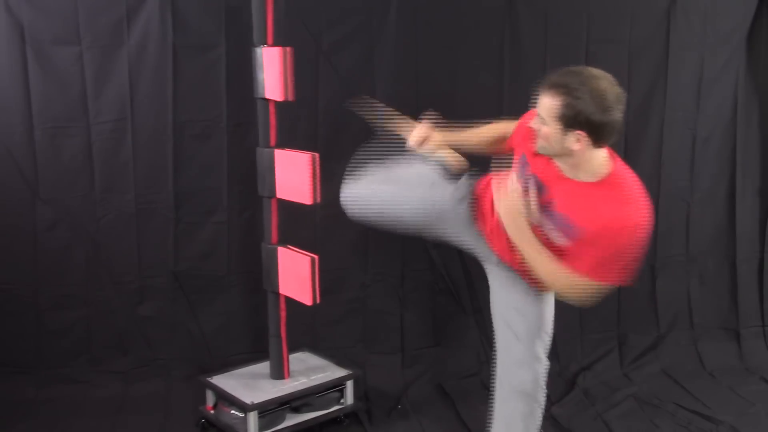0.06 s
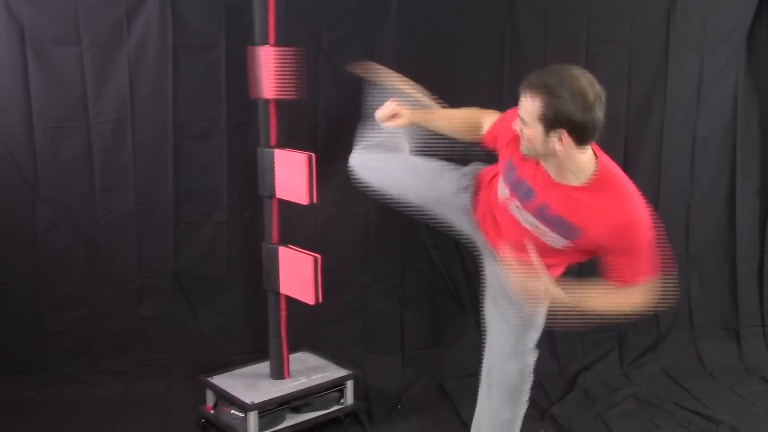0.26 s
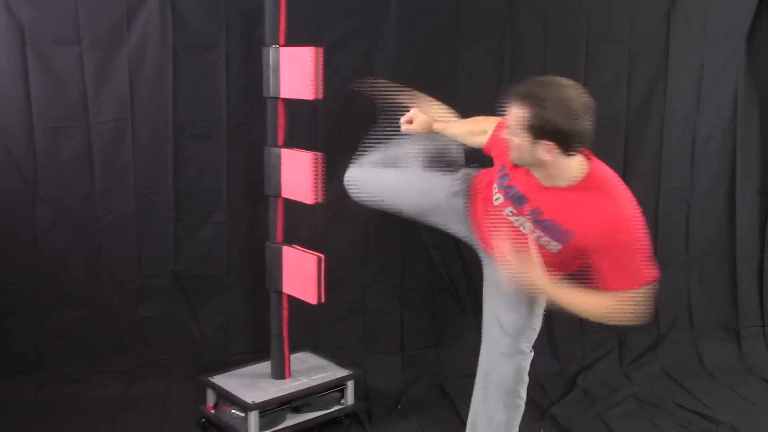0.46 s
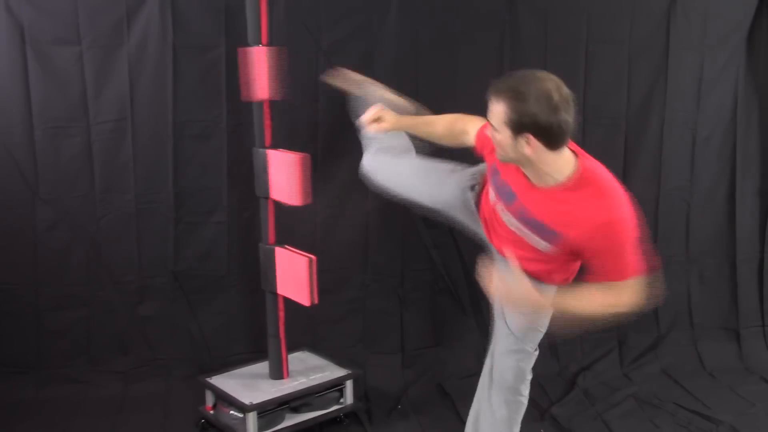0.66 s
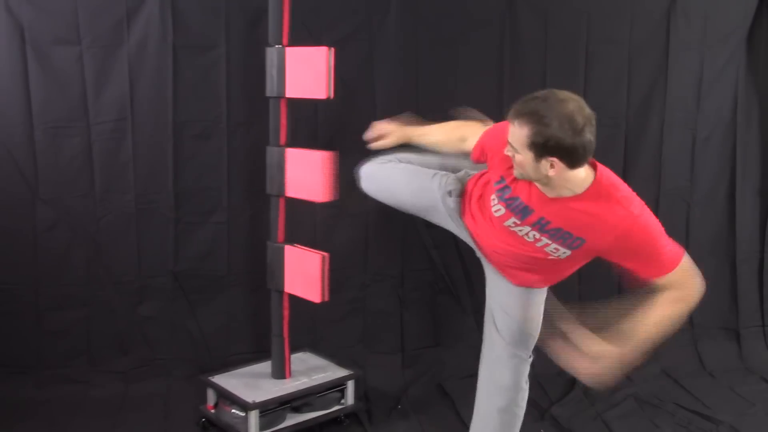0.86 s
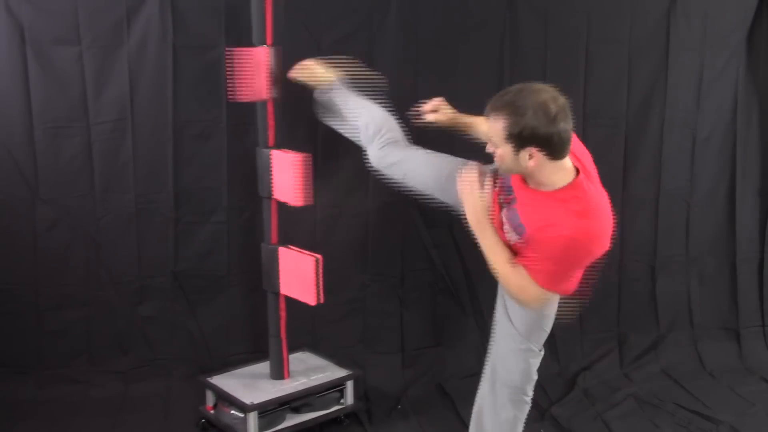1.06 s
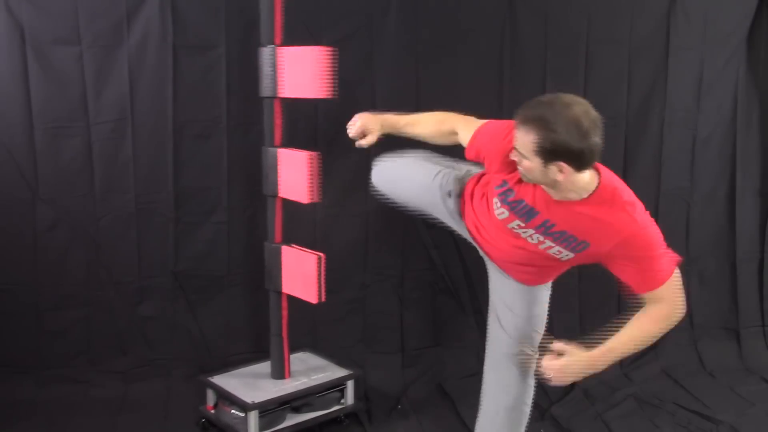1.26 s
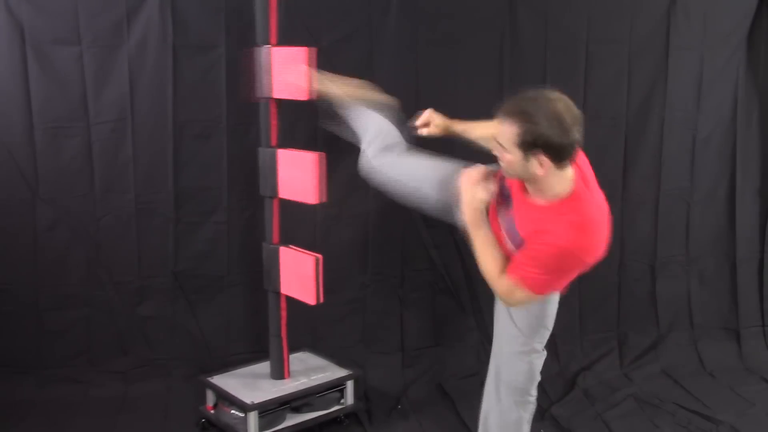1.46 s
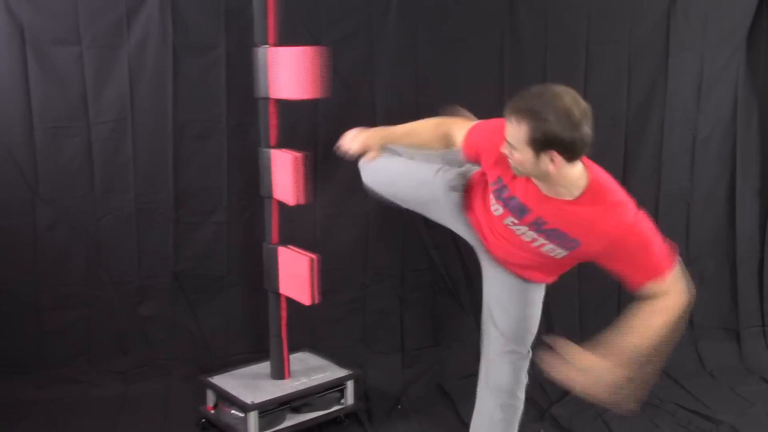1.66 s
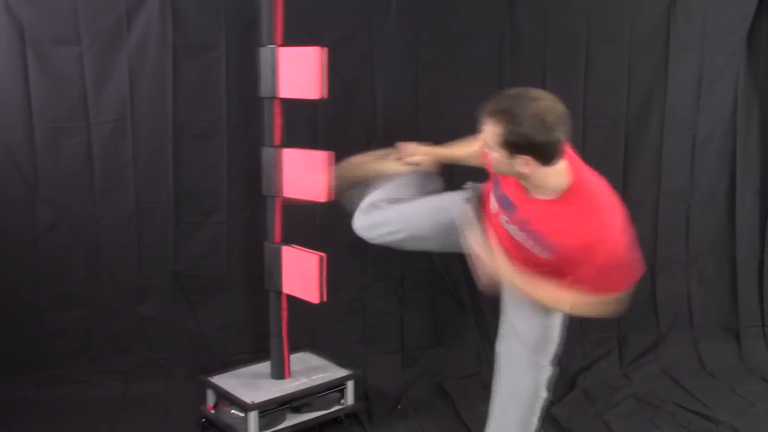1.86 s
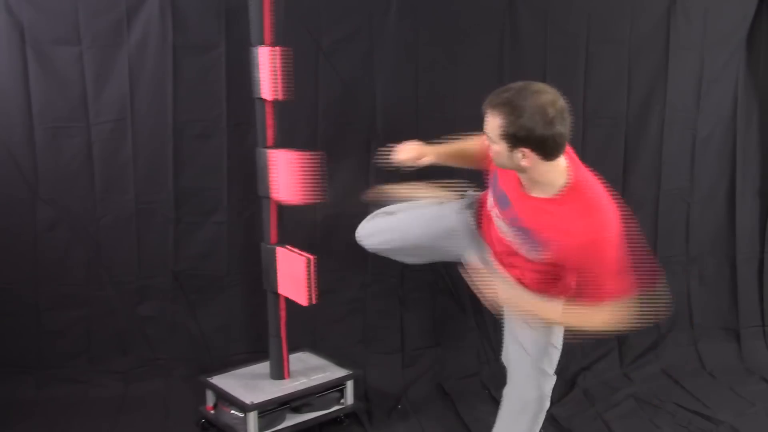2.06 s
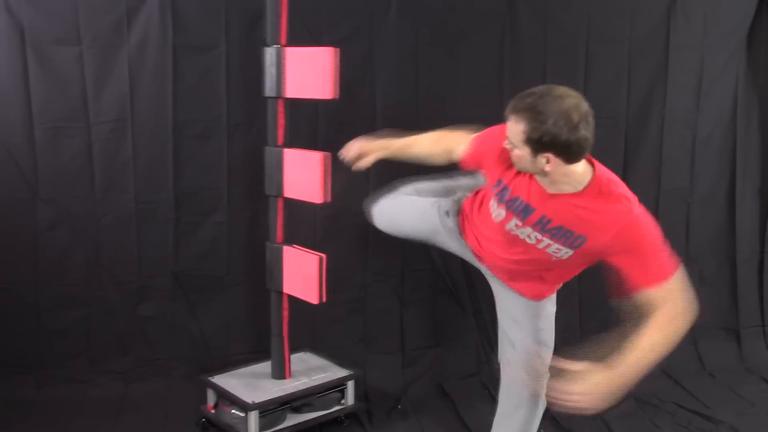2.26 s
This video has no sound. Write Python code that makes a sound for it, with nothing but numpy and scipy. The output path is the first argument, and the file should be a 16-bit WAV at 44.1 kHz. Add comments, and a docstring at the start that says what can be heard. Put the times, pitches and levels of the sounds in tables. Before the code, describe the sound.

A foot hits padded paddles five times, with slapping thuds and a short room echo.

```python
"""Faint knocks and a swish of trousers, then five quick kicks on padded paddles on a post.
Each kick is a light touch, a thud as the foam bottoms out, a slap of the pad and a crinkle
of its cover. The paddle swings back, scraping and knocking on its sprung mount; cloth
swishes between kicks. The bare training room echoes, and post and room ring low."""
import sys
import numpy as np
from scipy import signal
from scipy.fft import rfft, irfft
from scipy.io import wavfile
from scipy.ndimage import uniform_filter1d, minimum_filter1d

SR = 44100
rng = np.random.default_rng(int(sys.argv[2]) if len(sys.argv) > 2 else 0)


def master(y):
    """Save y as 16-bit WAV."""
    cut = np.clip(np.atleast_2d(y).T, -1, 1)
    pcm = np.round(cut * 32767)  # scale
    wavfile.write(sys.argv[1], SR, pcm.astype(np.int16))


N = 101429
BINS_HZ = abs(np.fft.fftfreq(4096, 1 / SR))


def amp(db):
    """Decibels to gain."""
    return 10 ** (np.asarray(db) / 20)


def unit(x):
    """Scale to unit energy."""
    return x / np.sqrt(np.sum(x ** 2) + 1e-20)


def read(table, hz=BINS_HZ):
    """Interpolate a table over log frequency."""
    table_hz, values = np.transpose(table)
    return np.interp(np.log(hz + 1), np.log(table_hz), values)


def add(mix, t_s, sound):
    """Mix a sound in at t_s."""
    part = mix[max(round(t_s * SR), 0):][:len(sound)]
    part += sound[:len(part)]


def bell(hz, centre_hz, width_oct):
    """Bell of height one over log frequency."""
    return 1 / (1 + (np.log2((hz + 1) / centre_hz) / width_oct) ** 2)


def pulse(spectrum_db):
    """Minimum-phase pulse of a given spectral shape, unit energy."""
    log_spectrum = np.conj(signal.hilbert(np.log(amp(spectrum_db))))
    return unit(np.fft.ifft(np.exp(log_spectrum)).real[:len(spectrum_db) // 2])


def burst(rise_s, fall_s):
    """Envelope: linear rise, exponential fall."""
    t = np.arange(SR // 5) / SR
    return np.minimum(t / rise_s, 1) * np.exp(-np.maximum(t - rise_s, 0) / fall_s)


def stroke(length_s, edge_s=0.0015):
    """Envelope: quick start, hold, quick release."""
    t = np.arange(SR // 5) / SR
    return np.minimum(t / edge_s, 1) * np.exp(-np.maximum(t - length_s, 0) / edge_s)


def rub(envelope, colour, spread_db):
    """Dense tiny clicks of uneven size, filtered by a material's pulse."""
    sizes = amp(spread_db * np.minimum(rng.exponential(1, N), 4))
    clicks = rng.standard_normal(N) * sizes
    return signal.fftconvolve(unit(clicks[:len(envelope)] * envelope), colour)


# Room decay: f/Hz, T60/s
ROOM_T60 = [(60, 0.83), (150, 0.94), (350, 0.66), (850, 0.61), (2200, 0.56), (6000, 0.66), (15000, 0.14)]
# Floor and nearest wall: delay/s, level/dB re direct
REFLECTIONS = [(.0043, -4.5), (.0092, -6)]


def room(x, direct_db, reflect_db=0, early_db=1.5, early_s=0.082, onset_s=0.001):
    """Direct sound, two near reflections and dense echoes, each band dying at its own rate."""
    t = np.arange(SR) / SR
    step = 12
    count = SR // step
    taps = np.zeros(SR)
    taps[np.arange(count) * step + rng.integers(0, step, count)] = rng.choice([-1., 1.], count)
    hz, frame_s, bands = signal.stft(taps, SR, nperseg=256)
    decay = amp(-60 * frame_s / read(ROOM_T60, hz)[:, None])
    tail = signal.istft(bands * decay, SR, nperseg=256)[1][:SR]
    near_walls = amp(early_db * np.exp(-(t / early_s) ** 2))
    response = unit(tail * np.minimum(t / onset_s, 1) * near_walls)
    response[0] += amp(direct_db)
    for delay_s, db in REFLECTIONS:
        response[round(delay_s * rng.uniform(.9, 1.1) * SR)] += amp(direct_db + reflect_db + db)
    return signal.fftconvolve(x, unit(response))


# Room noise spectrum: f/Hz, level/dB
AIR_SPECTRUM = [(20, -32), (60, -19.5), (85, -23), (140, -0.5), (400, 2), (800, -1), (1500, -7.5),
                (3500, -17), (6500, -21), (11000, -28.5), (16000, -44)]


def air(level_db=-44, waver_db=1.5):
    """Steady room noise, wavering slightly."""
    gains = amp(read(AIR_SPECTRUM, np.fft.rfftfreq(N, 1 / SR)))
    noise = irfft(rfft(rng.standard_normal(N)) * gains, N)
    drift = uniform_filter1d(uniform_filter1d(rng.standard_normal(N), size=2000), size=1500)
    return amp(level_db + waver_db * drift / drift.std()) * noise / noise.std()


# Knocks of mount and stand: t/s, level/dB
KNOCKS = [(0.029, -10), (0.073, -11), (0.148, -13), (0.168, -9), (0.807, -5), (1.3022, 3), (1.333, -1),
          (1.7222, 3), (1.7535, 0), (2.035, 1), (2.1495, -3)]
# Knock spectrum: f/Hz, level/dB
KNOCK_SPECTRUM = [(30, -94), (130, -31.5), (300, 6), (550, 9.5), (900, 1.5), (1600, -4), (3000, -18.5),
                  (7000, -37.5), (16000, -46)]


def mount_knocks(chatter_db=-4.5):
    """The paddle knocks against its stop; the loose mount chatters just after."""
    out, knock = np.zeros(N), pulse(read(KNOCK_SPECTRUM))
    for t_s, db in KNOCKS:
        add(out, t_s, amp(db) * room(knock, direct_db=1))
        chatter = rub(burst(rise_s=0.0012, fall_s=0.005), knock, spread_db=5)
        add(out, t_s, amp(db + chatter_db) * room(chatter, direct_db=4.5, reflect_db=-13))
    return out


# Cloth swishes: t/s, length/s, level/dB
SWISHES = [(0.066, 0.012, -35), (0.169, 0.036, -12), (0.438, 0.039, -19), (0.826, 0.011, -35),
           (1.942, .025, -12.5), (2.027, 0.024, -13.5), (2.257, .014, -25)]
# Cloth spectrum: f/Hz, level/dB
SWISH_SPECTRUM = [(30, -57), (500, -22), (2000, -7), (4500, -1.5), (7000, 1), (9500, -8.5), (12000, -14),
                  (14000, -22), (16000, -30)]


def trouser_swishes():
    """Cloth rubs as the leg snaps out and folds."""
    out, colour = np.zeros(N), pulse(read(SWISH_SPECTRUM))
    for t_s, length_s, db in SWISHES:
        swish = rub(stroke(length_s), colour, spread_db=9)
        add(out, t_s, amp(db) * room(swish, direct_db=4.5, reflect_db=-25))
    return out


# Foot meets pad: t/s, touch level/dB, squeeze length/s, squeeze level/dB
TOUCHES = [(0.2016, 4.5, 0.012, 9.5), (0.5912, -5.5, 0.0033, -13), (1.074, -2, 0.0041, -7),
           (1.526, -3, .008, 6), (1.9430, 2.5, 0.036, 0)]
# Touch spectrum: f/Hz, level/dB
TOUCH_SPECTRUM = [(30, -74), (130, -17.5), (300, -1.5), (600, 0.5), (1500, -1.5), (3000, -14), (7000, -24),
                  (12000, -32.5), (16000, -44)]


def toe_touches():
    """The toes touch the pad and squeeze the foam."""
    out, touch = np.zeros(N), pulse(read(TOUCH_SPECTRUM))
    for t_s, db, squeeze_s, squeeze_db in TOUCHES:
        add(out, t_s, amp(db) * room(touch, direct_db=-6.5))
        swell = np.linspace(.3, 1, round(squeeze_s * SR))
        squeeze = rub(swell, touch, spread_db=0.5)
        add(out, t_s, amp(squeeze_db) * room(squeeze, direct_db=1))
    return out


# Thuds: t/s, level/dB, boom f/Hz, ring offset/dB, second push delay/s, push level/dB
THUDS = [(0.2074, 17, 388, -3, 0.017, 10.5), (0.597, 14, 290.3, -0.5, .0150, 12),
         (1.0774, 13, 364, -3, .0110, 11.5), (1.5345, 18, 320, -3, .0235, 10.5),
         (1.9732, 9.5, 307, -15, 0.0088, 8)]
# Thud spectrum: f/Hz, level/dB
THUD_SPECTRUM = [(25, -75), (60, -44), (85, -42.5), (110, -21.5), (170, -14), (260, -4), (400, -2.5),
                 (650, -2.5), (1000, -9), (1800, -17), (2800, -25), (6500, -39), (11000, -47), (16000, -80)]


def foam_thuds(boom_db=2):
    """The foam bottoms out and sets the post ringing; the foot drives on in a second push."""
    out = np.zeros(N)
    for t_s, db, boom_hz, ring_db, push_s, push_db in THUDS:
        thud = pulse(read(THUD_SPECTRUM) + boom_db * bell(BINS_HZ, boom_hz, width_oct=0.23))
        add(out, t_s, amp(db) * room(thud, direct_db=-10))
        add(out, t_s, amp(db + ring_db) * post_ring(boom_hz))
        add(out, t_s + push_s, amp(push_db) * room(thud, direct_db=-8.5))
    return out


# Modes of post and room: f/Hz, level/dB, T60/s
MODES = [(270.7, -0.5, 0.65), (349.3, -1.5, 0.74), (368, -0.5, 0.49), (409.4, 0.5, 0.58), (436, 4, 0.44),
         (519, 5, 0.37), (592.5, 1, 0.59), (706, -4, 0.51), (861, 5, 0.42), (969, -10, 0.78),
         (1173, 4, 0.17)]


def post_ring(boom_hz, gain_db=-37.5, focus_db=10.5, rise_s=0.012):
    """Post and room ring after a blow; modes near the boom pitch are boosted."""
    t = np.arange(SR) / SR
    ring = np.zeros(SR)
    for hz, db, t60_s in MODES:
        start_db = db + focus_db * bell(hz, boom_hz, width_oct=0.13)
        ring += amp(start_db - 60 * t / t60_s) * np.sin(2 * np.pi * (hz * t + rng.random()))
    return amp(gain_db) * np.minimum(t / rise_s, 1) * ring


# Cover crinkles: t/s, level/dB
CRINKLES = [(0.211, 1.5), (0.606, 4.5), (1.082, -1), (1.551, -0.5), (1.957, -3.5)]
# Crinkle spectrum: f/Hz, level/dB
CRINKLE_SPECTRUM = [(30, -52), (600, -1), (2000, 9), (4200, 4.5), (7000, -0.5), (9000, -15), (11500, -11),
                    (16000, -33)]


def cover_crinkles():
    """The pad's cover crinkles under each kick."""
    out, colour = np.zeros(N), pulse(read(CRINKLE_SPECTRUM))
    for t_s, db in CRINKLES:
        crinkle = rub(burst(rise_s=0.013, fall_s=0.024), colour, spread_db=4.5)
        add(out, t_s, amp(db) * room(crinkle, direct_db=7.5, reflect_db=-5))
    return out


# Pad slaps: t/s, length/s, level/dB, boost f/Hz
SLAPS = [(0.217, 0.0085, 16.5, 1760), (0.5952, 0.0038, 7.5, 1210), (0.609, 0.0176, 10.5, 990),
         (1.0880, 0.0041, 14.5, 1330), (1.5434, 0.0095, 13.5, 1700), (1.965, 0.0027, 1.5, 2020)]
# Slap spectrum: f/Hz, level/dB
SLAP_SPECTRUM = [(30, -82), (150, -57), (400, 9.5), (900, -3.5), (1400, -0.5), (2200, -2.5), (3000, -12),
                 (5000, -22.5), (8000, -26), (16000, -59)]


def pad_slaps(boost_db=8, draws=4):
    """The pad slaps the foot and its own arm; several noise draws are summed for a smooth slap."""
    out = np.zeros(N)
    for t_s, length_s, db, hz in SLAPS:
        colour = pulse(read(SLAP_SPECTRUM) + boost_db * bell(BINS_HZ, hz, width_oct=0.64))
        for _ in range(draws):
            slap = rub(stroke(length_s, edge_s=0.0011), colour, spread_db=4) / np.sqrt(draws)
            add(out, t_s, amp(db) * room(slap, direct_db=0.5, reflect_db=-3.5))
    return out


# Skin on cover: t/s, length/s, level/dB
CRACKS = [(0.218, 0.0055, -7), (1.0840, 0.0018, -7)]
# Crack spectrum: f/Hz, level/dB
CRACK_SPECTRUM = [(30, -50), (1000, -18), (4000, 11), (7000, 1), (11000, -5), (13500, -7), (16000, -22)]


def skin_cracks():
    """Skin meets the cover with a sharp crack."""
    out, colour = np.zeros(N), pulse(read(CRACK_SPECTRUM))
    for t_s, length_s, db in CRACKS:
        crack = rub(stroke(length_s, edge_s=0.00078), colour, spread_db=6)
        add(out, t_s, amp(db) * room(crack, direct_db=14, reflect_db=-10))
    return out


# Mount scrapes: t/s, length/s, level/dB, centre f/Hz
SCRAPES = [(0.450, 0.027, -9, 2440), (0.517, 0.011, -20, 2880), (0.798, 0.016, -5, 1300),
           (0.819, 0.0033, -14, 3040), (0.841, 0.017, -5, 1670), (1.327, 0.0085, -15.5, 2210),
           (1.753, 0.0049, -13, 2160), (2.134, 0.024, -8, 1380), (2.2633, 0.012, -7.5, 1850)]


def mount_scrapes(skirt_db_per_oct=15, knee_oct=0.18):
    """The sprung mount scrapes as the paddle swings back."""
    out = np.zeros(N)
    for t_s, length_s, db, centre_hz in SCRAPES:
        offset_oct = np.log2(np.maximum(BINS_HZ, 30) / centre_hz)
        colour = pulse(-skirt_db_per_oct * np.hypot(offset_oct, knee_oct))
        scrape = rub(stroke(length_s), colour, spread_db=3)
        add(out, t_s, amp(db) * room(scrape, direct_db=2, reflect_db=-19))
    return out


# Tick spectrum: f/Hz, level/dB
TICK_SPECTRUM = [(30, -50), (2000, -6), (5000, -7), (7300, 8), (9000, -12), (12000, -9), (16000, -19)]


def tick(t_s=1.4098, level_db=-19):
    """One small sharp tick close by."""
    out, colour = np.zeros(N), pulse(read(TICK_SPECTRUM))
    click = rub(burst(rise_s=0.0003, fall_s=0.0018), colour, spread_db=-1)
    add(out, t_s, amp(level_db) * room(click, direct_db=21, reflect_db=-10))
    return out


def scene():
    """Kicks, mount, cloth, tick and room noise in mono."""
    kicks = toe_touches() + foam_thuds() + pad_slaps() + cover_crinkles() + skin_cracks()
    return (kicks + mount_knocks() + mount_scrapes() + trouser_swishes() + tick() + air())[None]


def record(dry, limit_db=-3, hold_s=0.0046, cutoff_hz=15750):
    """Fast peak limiter, then a steep low-pass."""
    hold = round(hold_s * SR)
    allowed = np.minimum(1, amp(limit_db) / (abs(dry) + 1e-9))
    gain = uniform_filter1d(minimum_filter1d(allowed, hold), hold)
    lowpass = signal.firwin(511, cutoff_hz, window=("kaiser", 9), fs=SR)
    return signal.oaconvolve(dry * gain, lowpass[None], "same")


dry = scene()
out = record(dry)
master(out)
```